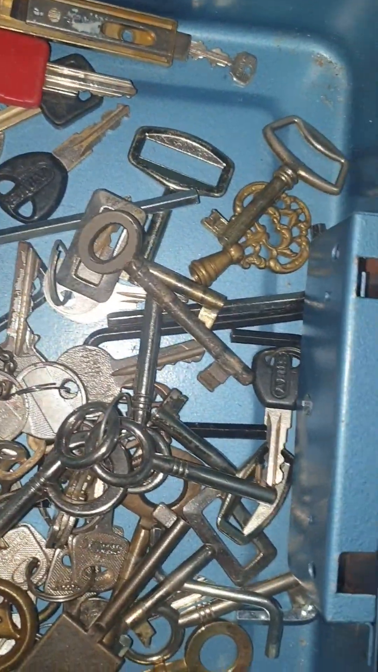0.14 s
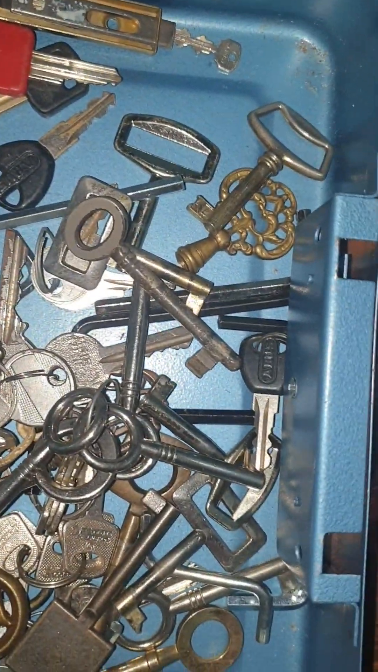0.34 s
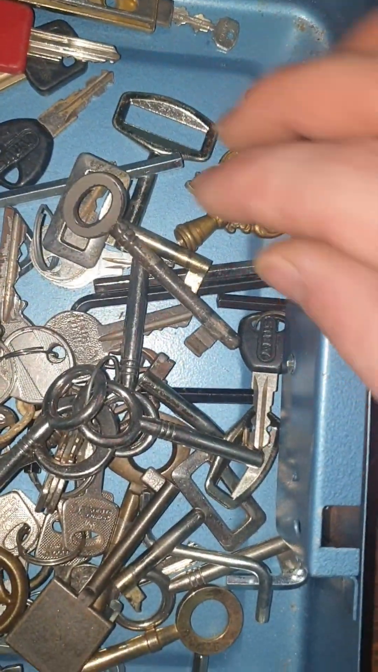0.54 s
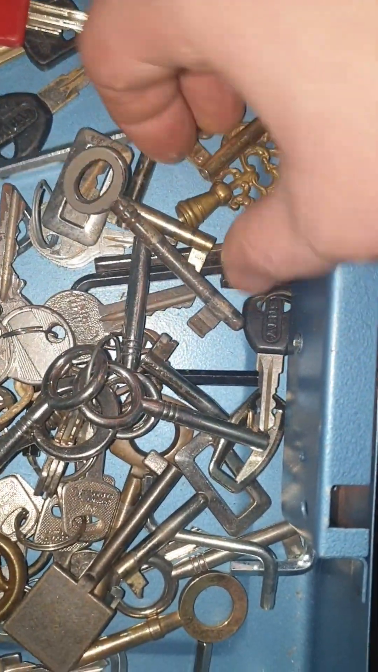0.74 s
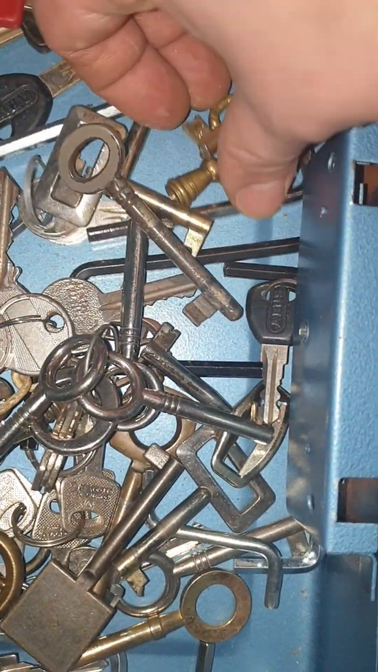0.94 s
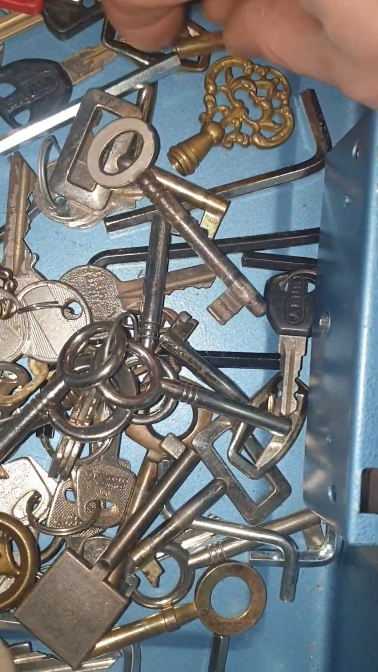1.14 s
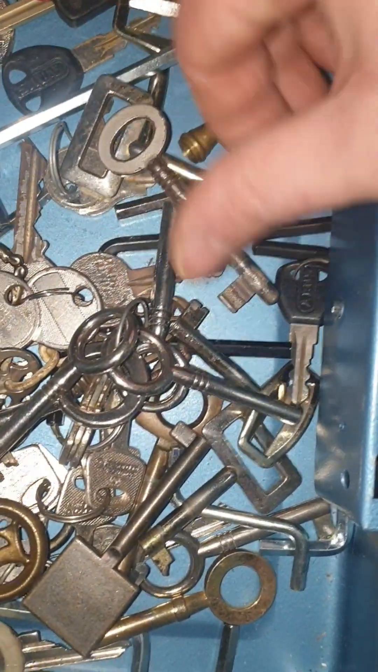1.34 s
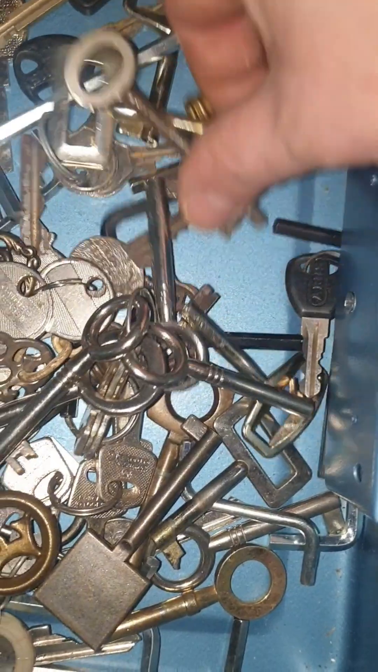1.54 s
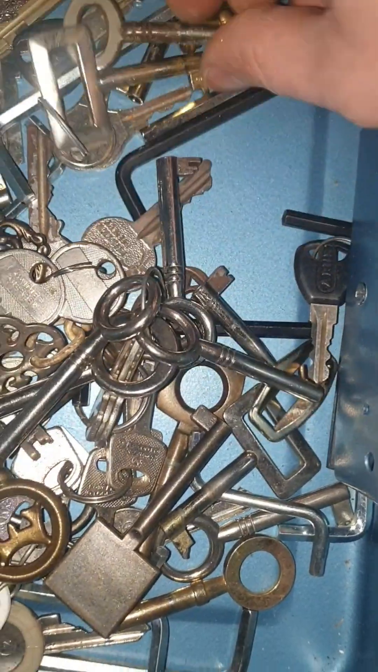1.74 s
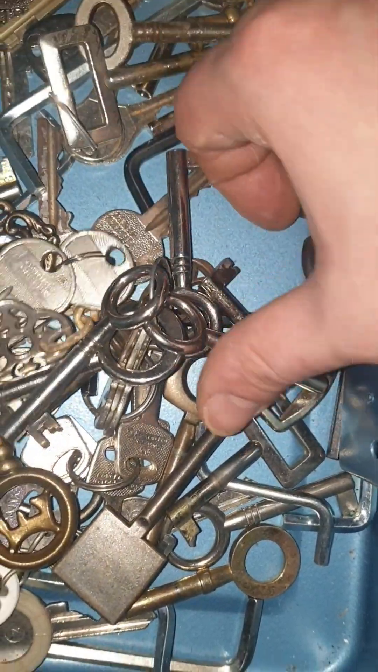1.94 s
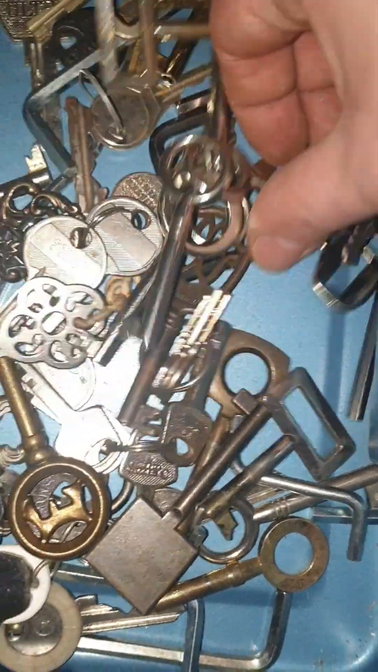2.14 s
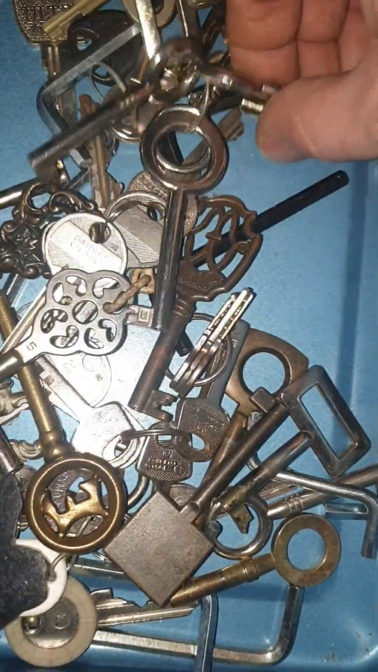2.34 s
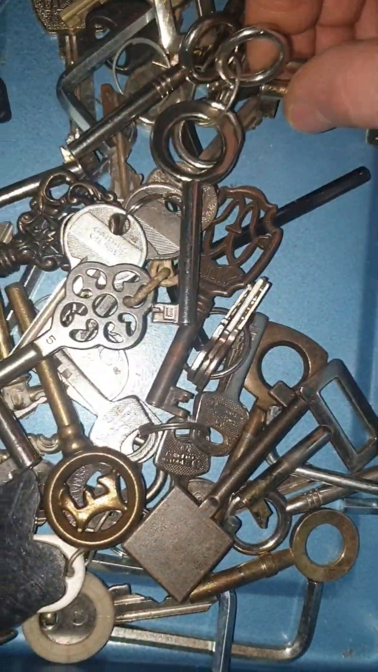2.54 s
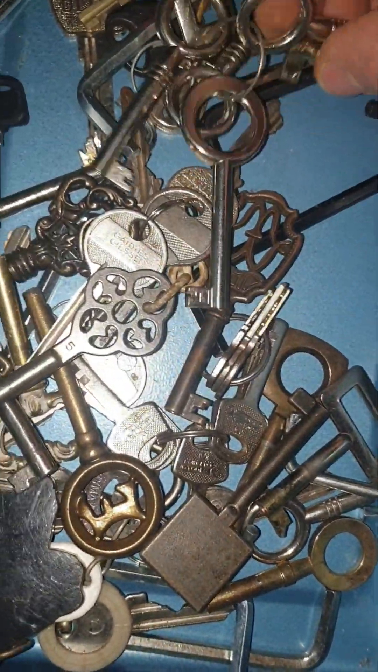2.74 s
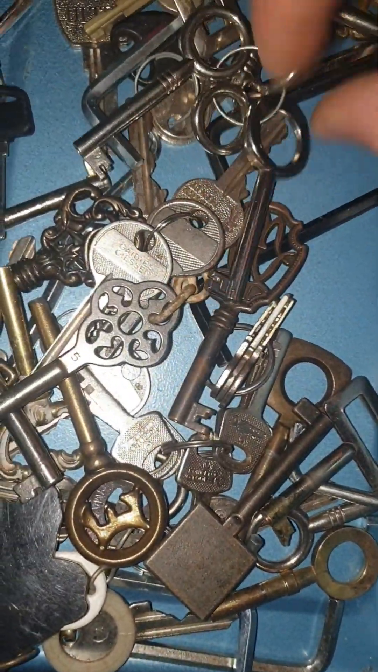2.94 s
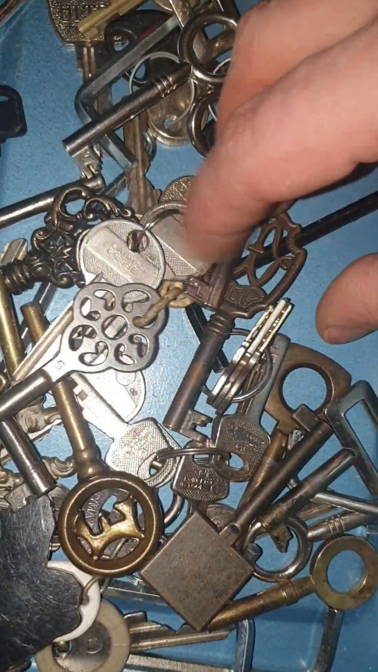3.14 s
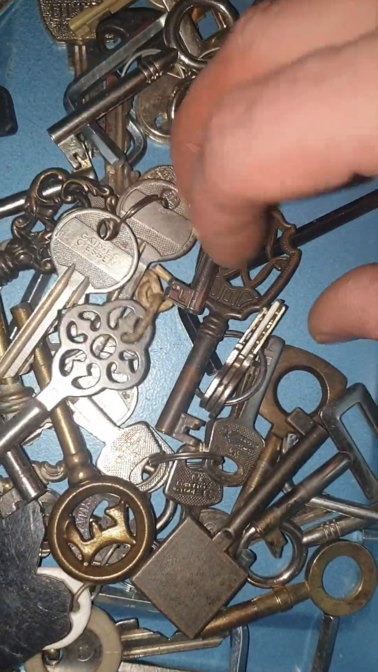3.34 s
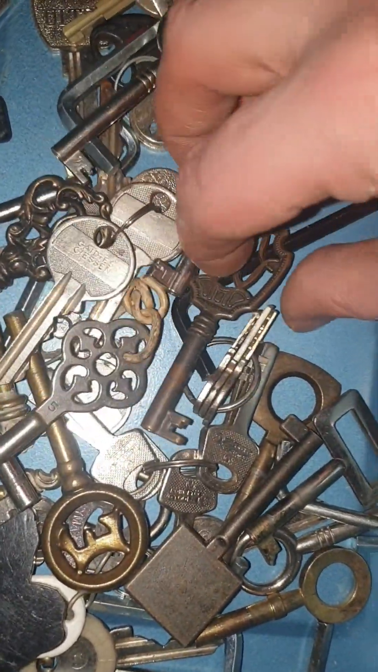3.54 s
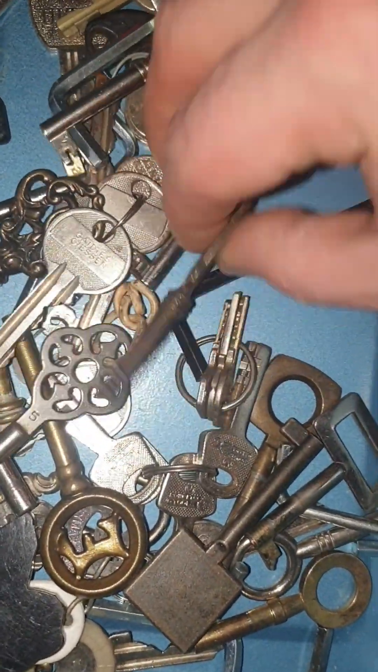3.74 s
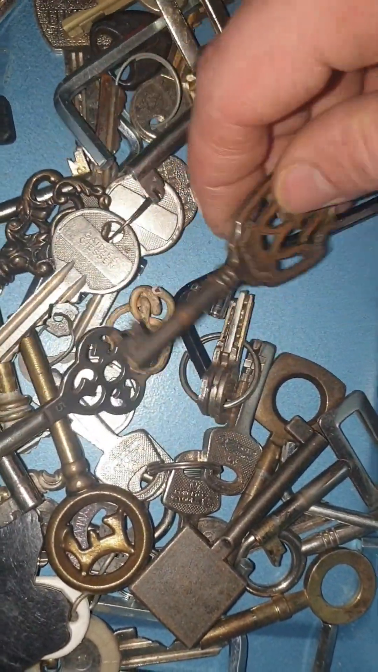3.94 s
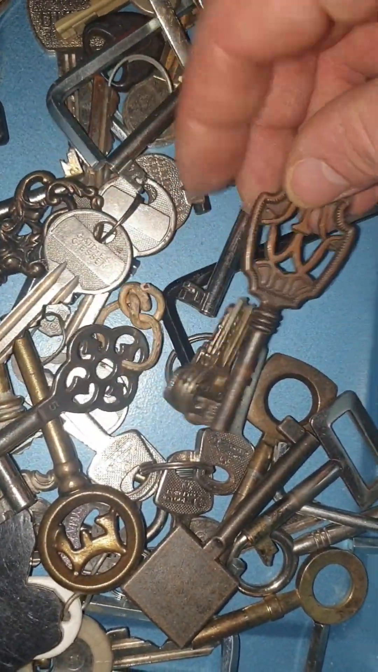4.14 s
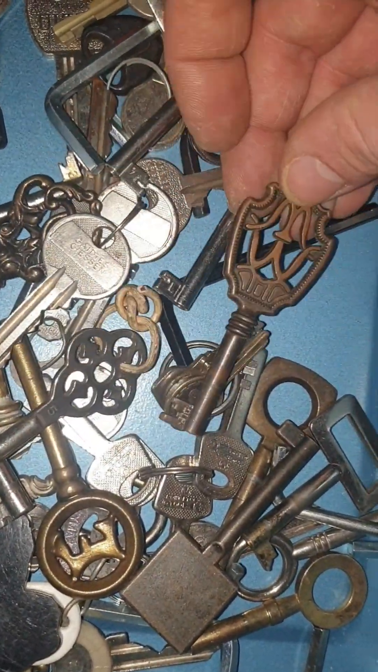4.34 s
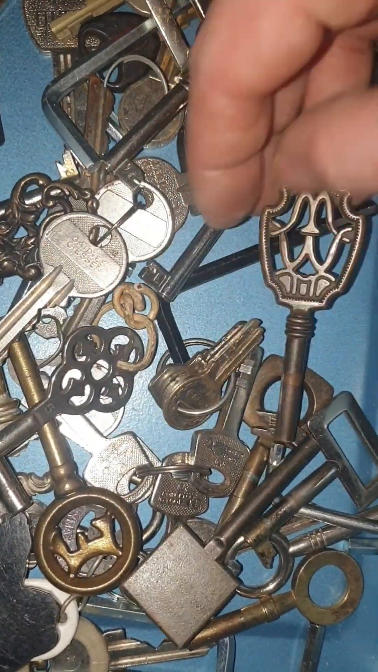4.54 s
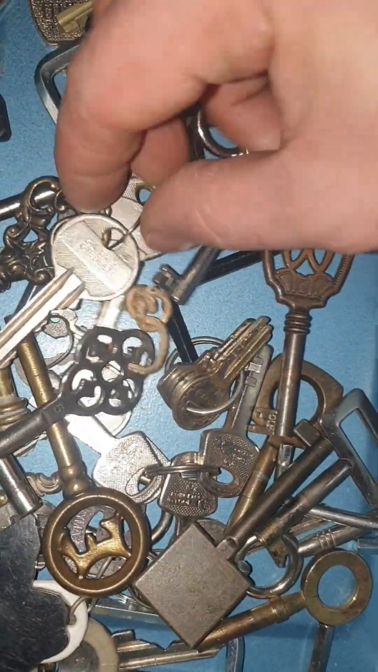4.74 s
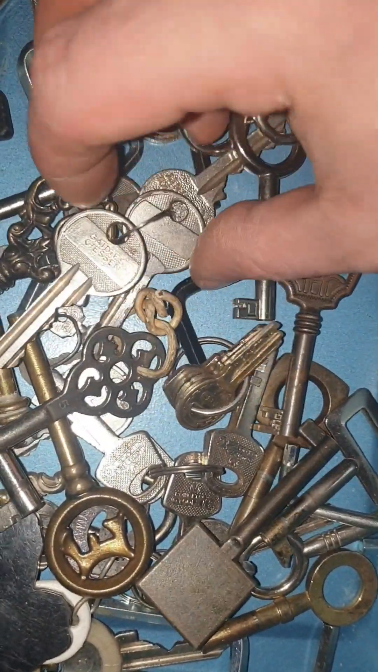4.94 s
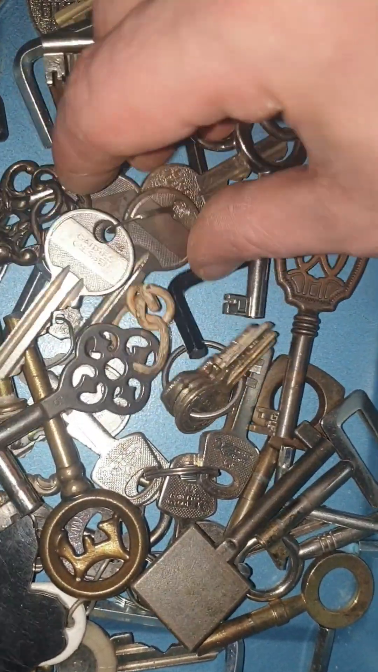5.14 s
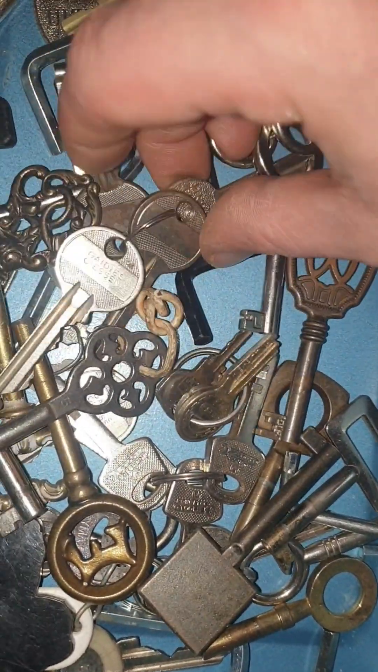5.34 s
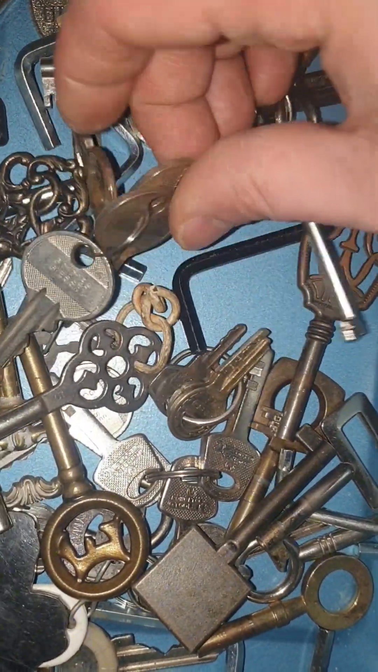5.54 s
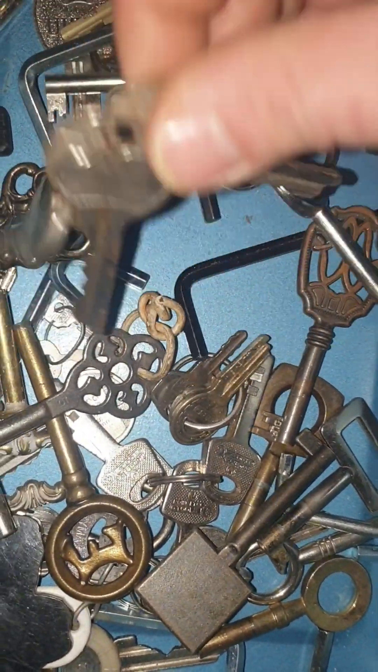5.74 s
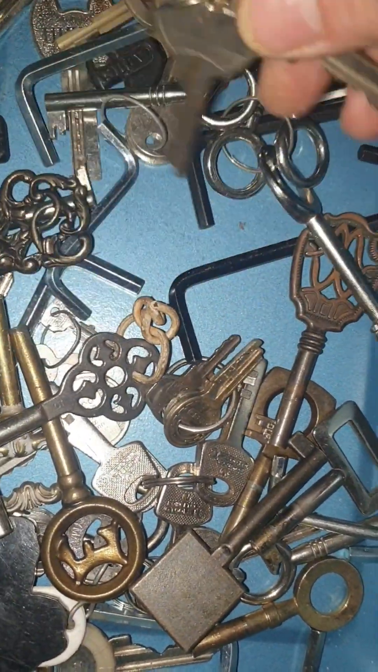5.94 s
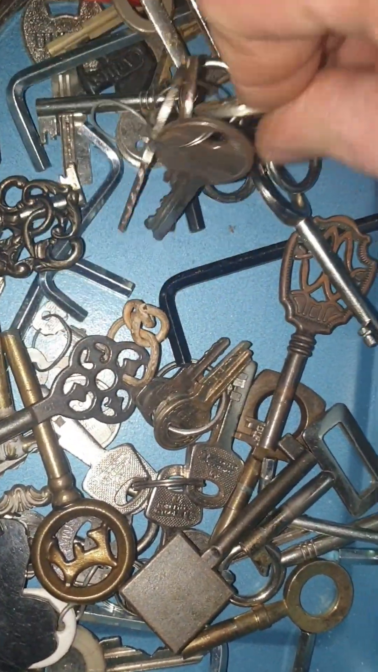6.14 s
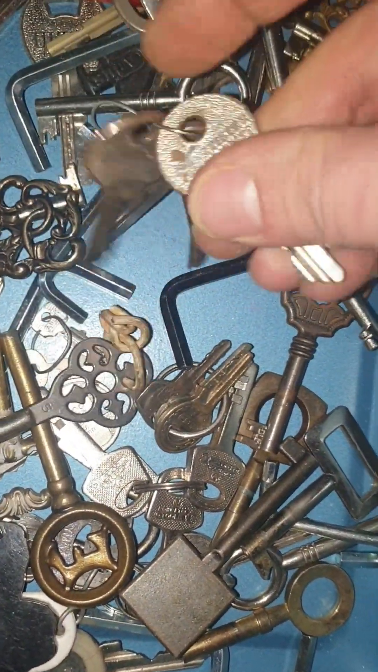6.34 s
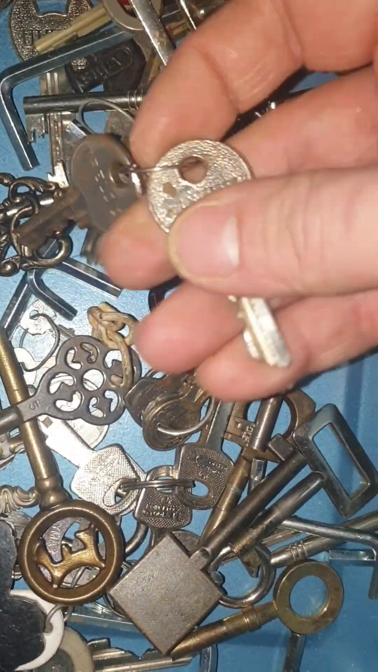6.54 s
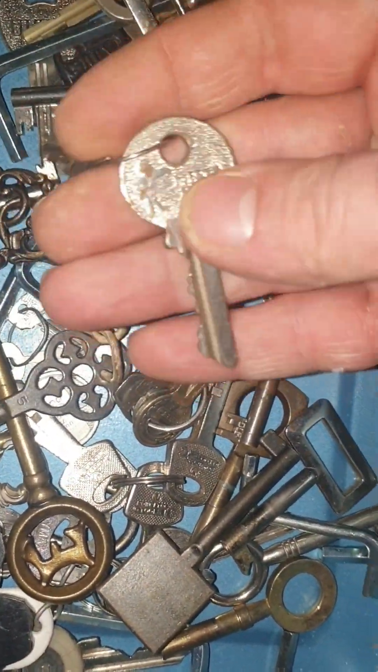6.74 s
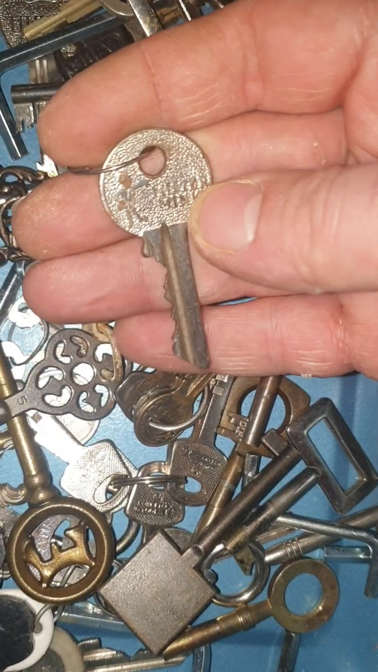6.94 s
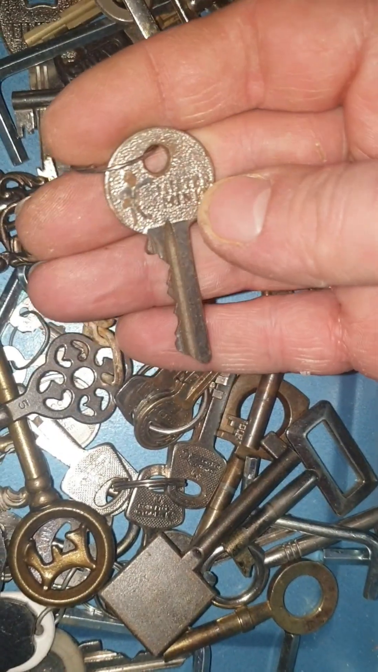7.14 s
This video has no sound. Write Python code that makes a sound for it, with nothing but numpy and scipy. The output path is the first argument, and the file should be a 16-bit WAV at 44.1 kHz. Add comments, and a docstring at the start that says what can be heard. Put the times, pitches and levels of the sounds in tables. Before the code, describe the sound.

A hand rummages through a pile of old keys in a metal box. The keys scrape, clatter and clink in uneven bursts, with thin, high pings over the sharper knocks. About two seconds in, the box takes a few soft bumps and the microphone rumbles from handling. The stirring continues, then a lifted bunch jingles and a few last clinks die away. It is heard close up on a phone in a small, quiet room.

```python
"""Rummaging through a box of keys

A hand stirs a pile of old keys in a metal box, close to a phone in a small room. Each shove sets the
keys scraping, jostling and pinging until the pile settles. The harder knocks stand out, and keys that
hang free ring on in the high treble. The box hums under the blows; the phone rumbles in the other hand."""
import sys
import numpy as np
from scipy import signal
from scipy.fft import rfft, irfft
from scipy.io import wavfile

SR = 44100
rng = np.random.default_rng(int(sys.argv[2]) if len(sys.argv) > 2 else 0)


def wav_out(sig):
    """Save sig, one row per channel (or a flat mono array), as 16-bit PCM at SR to the path in sys.argv[1]."""
    wavfile.write(sys.argv[1], SR, np.round(np.clip(np.atleast_2d(sig).T, -1, 1) * 32767).astype(np.int16))


N = 320607
T = np.arange(N) / SR
RUMMAGE_FROM_S, RUMMAGE_TO_S = .65, 5.75  # the hand works in the pile
KEY_DETUNE = .022  # similar keys differ in pitch by this share, so their rings beat
TOP_HZ = 15900  # the phone's treble limit


def amp(db):
    """Decibels to gain."""
    return 10 ** (np.asarray(db) / 20)


def fade(t, t60):
    """A decay of 60 dB in t60 seconds."""
    return np.exp(-np.log(1000) * t / t60)


def unit(x):
    """Scale to rms 1."""
    return x / np.sqrt(np.mean(x ** 2))


def add(out, start_s, sound):
    """Mix a sound into the track at its start time."""
    i = int(start_s * SR)
    out[:, i:i + sound.shape[1]] += sound[:, :N - i]


def band(x, lo_hz, hi_hz, order=2):
    """Band-pass along time."""
    return signal.sosfilt(signal.butter(order, [lo_hz, hi_hz], "band", fs=SR, output="sos"), x)


def colour(x, points):
    """A minimum-phase EQ through (Hz, dB) points."""
    hz, db = np.transpose(points)
    grid_hz = np.linspace(1, SR / 2, 513)
    gain = amp(np.interp(np.log(grid_hz), np.log(hz), db))
    cepstrum = irfft(np.log(gain))
    cepstrum[1:512] *= 2  # folded forward, so nothing rings ahead of a hit
    cepstrum[513:] = 0
    response = irfft(np.exp(rfft(cepstrum)))[:512]
    return signal.fftconvolve(x, np.array(response, ndmin=x.ndim), axes=-1)[..., :x.shape[-1]]


def moves(rows, attack_s, release_t60):
    """A gain envelope: each move of the hand builds up, holds and dies away."""
    out, t = np.zeros((1, N)), T[:SR]
    attack = np.clip(t / attack_s, 0, 1)
    for start, length, db in rows:
        release = fade(np.maximum(t - length, 0), release_t60)
        add(out, start, (amp(db) * attack * release)[None])
    return out[0]


# The tone of key touching key in the pile. Each row: frequency in Hz, gain in dB.
CONTACT_EQ = [(60, -22.5), (200, -14), (400, -6.5), (700, -1), (1400, 1), (2100, 3.5), (3300, -4),
              (4600, -7), (6400, -15), (7900, -24), (9300, -17), (10500, -10.5), (12200, -25.5),
              (15500, -31.5)]


def clacks(count, crack_t60=.016, walls_t60=.16, pile_t60=.06, chatter_s=.003, likeness=.19):
    """Stereo contacts: a chattering crack, echoes between the box walls and the pile's damped modes."""
    t = T[:5000]
    hz = np.geomspace(900, 15500, 300) * (1 + .005 * rng.standard_normal(300))
    tilt = (hz[:, None] / hz.mean()) ** .5
    modes = np.sin(2 * np.pi * hz[:, None] * t) * fade(t, pile_t60) * tilt
    # a different few modes stand out each time
    uneven_db = 10 * np.clip(rng.standard_normal((count, 1, len(hz))), -2.2, 2.2)
    weights = amp(uneven_db) * rng.standard_normal((count, 2, len(hz)))
    weights /= np.sqrt(np.sum(weights ** 2, axis=-1, keepdims=True))
    # the key touches a second time within a few milliseconds
    since_touch = t - chatter_s * rng.uniform(.65, 2, (count, 1, 1))
    chatter = amp(-2) * fade(np.abs(since_touch), crack_t60) * (since_touch > 0)
    envelope = fade(t, crack_t60) + chatter + amp(-16) * fade(t, walls_t60)
    crack = rng.standard_normal((count, 2, len(t))) * envelope
    pile = amp(-2) * weights @ modes
    attack = np.clip(t / .001, 0, 1)
    contacts = colour((crack + pile) * attack, CONTACT_EQ)
    # the right mic hears the same lows a little later, and partly different treble
    late_left = np.pad(contacts[:, 0], ((0, 0), (8, 0)))[:, :len(t)]
    blend = likeness * late_left + np.sqrt(1 - likeness ** 2) * contacts[:, 1]
    contacts[:, 1] = late_left + band(blend - late_left, 800, 10000, order=1)
    return contacts


# The hand jogs the box, or shoves or lifts a heap of keys.
# Each row: start in seconds, length in seconds, effort in dB.
HAND_SHOVES = [(0.027, 0.034, -53.5), (0.598, 0.12, -53), (0.643, 0.036, -32), (0.812, 0.2, -43),
               (1.079, 0.097, -34), (1.183, 0.029, -48.5), (1.407, 0.14, -29.5), (1.526, 0.12, -24),
               (1.328, 0.14, -62.5), (1.7, 0.18, -48.5), (1.931, 0.055, -37.5), (1.995, .12, -26),
               (2.117, 0.25, -33), (2.394, 0.13, -45), (2.583, 0.052, -40.5), (2.729, 0.079, -29),
               (2.861, 0.083, -27), (3.059, 0.31, -44.5), (3.412, 0.19, -43.5), (3.623, 0.17, -38.5),
               (3.813, .11, -32), (3.986, 0.18, -41), (4.321, 0.066, -56.5), (4.435, 0.067, -45.5),
               (4.605, 0.039, -24), (4.741, 0.074, -36), (4.811, 0.09, -34), (5.026, 0.17, -36.5),
               (5.27, 0.045, -33.5), (5.383, 0.2, -34.5), (5.597, 0.11, -40.5), (5.788, 0.017, -43),
               (6.341, .16, -50), (6.685, 0.025, -44), (6.836, 0.023, -48.5)]


def effort():
    """How hard the hand stirs, in dB: the keys get going quickly and take a moment to settle."""
    return 20 * np.log10(moves(HAND_SHOVES, attack_s=.023, release_t60=.2) + 1e-5)


def scraping(push_db, slips_per_s=480, spread_db=7, over_db=2, usual_push_db=-42):
    """Teeth and rings slide over each other in a stream of tiny slips, brighter when pushed harder."""
    kinds, scrape = clacks(count=20), 0
    for clack in kinds:
        slips = np.zeros(N)
        at = rng.integers(N, size=int(slips_per_s * N / SR / len(kinds)))
        slips[at] = amp(spread_db * np.clip(rng.standard_normal(len(at)), -2, 2))
        scrape = scrape + signal.oaconvolve(slips[None], unit(clack), axes=1)[:, :N]
    scrape = unit(scrape)
    body = signal.sosfiltfilt(signal.butter(2, 7500, fs=SR, output="sos"), scrape)
    treble = scrape - body
    treble_db = -2 + .9438 * (push_db - usual_push_db)
    return (body + amp(treble_db) * treble) * amp(push_db + over_db)


# The modes of the box's floor and walls. Each row: pitch in Hz, level in dB, t60 in seconds.
BOX_MODES = [(84, -12, .35), (99, -4, .4), (116, -9, .3), (253, -9, .3), (300, -11, .25), (530, -9, .2),
             (804, -10, .2), (934, -9, .2), (1336, -13, .2), (1780, -10, .25), (2035, -9, .18),
             (2400, -11, .2)]


def box_hum(blows, gain_db=-47):
    """The blows pass into the sheet metal, which hums on."""
    t = T[:SR]
    ring = sum(amp(db) * np.sin(2 * np.pi * hz * t) * fade(t, t60) for hz, db, t60 in BOX_MODES)
    return amp(gain_db) * signal.oaconvolve(blows, ring[None], axes=1)[:, :N]


def room(x):
    """A small furnished room; the lows stay longest and reach both mics alike."""
    t = T[:SR * 2 // 3]
    onset = np.clip(t / .0032 - .5, 0, 1)

    def tail(lo_hz, hi_hz, t60, db, channels):
        """One band of the reverb, as decaying noise."""
        noise = rng.standard_normal((channels, len(t))) * fade(t, t60) * onset
        return amp(db) * band(noise / np.sqrt(np.sum(noise ** 2) / channels), lo_hz, hi_hz)

    low = tail(60.4, 525, t60=.59, db=-12, channels=1)
    mid = tail(550, 12000, t60=.15, db=-13, channels=2)
    high = tail(2870, 14000, t60=.067, db=-18, channels=2)
    return signal.oaconvolve(x, low + mid + high, axes=1)[:, :N]


# The tone of the quiet room. Each row: frequency in Hz, gain in dB.
ROOM_TONE_EQ = [(30, -7), (100, -17), (400, -10.5), (2000, -6), (15000, -29.5)]


def room_tone(level_db=-81):
    """A faint, steady bed of air."""
    return amp(level_db) * unit(colour(rng.standard_normal((2, N)), ROOM_TONE_EQ))


# Faint handling before the hand reaches the pile.
# Each row: start in seconds, length in seconds, level in dB.
SKIN_BRUSHES = [(0.055, 0.05, -58), (0.445, 0.015, -65.5)]


def rustles():
    """Skin brushes near the phone, soft and dull."""
    brush = unit(band(rng.standard_normal(N), 130, 600))
    return brush * moves(SKIN_BRUSHES, attack_s=.0056, release_t60=.5)


def wall_rub(level_db=-57):
    """The heel of the hand rubs the box wall with a low murmur on each shove of the rummaging."""
    rubs = [(start, length, level_db) for start, length, _ in HAND_SHOVES
            if RUMMAGE_FROM_S < start + length < RUMMAGE_TO_S]
    murmur = unit(band(rng.standard_normal(N), 85, 150))
    return murmur * moves(rubs, attack_s=.048, release_t60=.3)


# The phone shifts in the grip. Each row: start in seconds, length in seconds, rumble level in dB.
GRIP_MOVES = [(0.64, .55, -52.5), (1.4, .2, -65), (1.85, .17, -48.5), (2.03, 0.31, -35),
              (2.36, 0.15, -44.5), (2.73, .1, -54), (4.53, .06, -39.5)]


def grip_rumble(left_db=-19, knuckle_db=-14, still_db=-84):
    """Fingers shifting on the phone rumble mostly into the right mic."""
    noise = rng.standard_normal((2, N))
    rumble = unit(band(noise, 45, 85, order=3)) * amp([[left_db], [0]])
    knuckles = amp(knuckle_db) * unit(band(noise[0], 90, 220))
    grip = moves(GRIP_MOVES, attack_s=.07, release_t60=.22) + amp(still_db)
    return (rumble + knuckles) * grip


# The featured hits of key on key. Each row: start in seconds, level of the mid clatter in dB,
# then the low knock and the bright tick, both in dB relative to the clatter.
KEY_HITS = [(0.6465, -18.5, -13.5, -1.5), (0.6858, -17, -16, -19), (0.6931, -16, -7.5, -10.5),
            (0.7527, -25, -10.5, -11.5), (0.834, -34.5, -1, -9), (0.936, -21.5, -7, -7.5),
            (1.0131, -29, -2.5, -20), (1.0556, -22.5, -7, -7.5), (1.1042, -24, -1.5, -8),
            (1.1154, -12, -9.5, -9.5), (1.1566, -14.5, -8, -11), (1.226, -28.5, -7.5, -10),
            (1.3099, -36, -8, -25), (1.4038, -25.5, -3.5, -19), (1.442, -11.5, -11.5, -7.5),
            (1.4513, -9.5, -19, -11), (1.5373, -15.5, -15, -25), (1.556, -11.5, -20.5, -22),
            (1.5709, -19, -15, -27), (1.596, -8.5, -12, -11), (1.6169, -18.5, -8, -7),
            (1.6717, -19.5, -26.5, -7), (1.7246, -26, -3, 0.5), (1.8061, -26, -6.5, -10.5),
            (1.9094, -30.5, -8, -0.5), (2.0327, -16.5, -11, -15), (2.0512, -12.5, -7, -7),
            (2.068, -11, -7.5, -8), (2.0848, -14, -10, -2.5), (2.1586, -14.5, -5, -5),
            (2.1886, -24, -14, -13), (2.3303, -15, -6, -8), (2.4445, -19.5, -3.5, -6.5),
            (2.5013, -32.5, -21.5, -17), (2.6138, -30.5, -3, -2), (2.7238, -30.5, -7, -8),
            (2.768, -22, -8, 0), (2.871, -22, 3.5, -4.5), (2.8937, -14.5, -5.5, -7),
            (2.9056, -13.5, -3, -2.5), (2.928, -18.5, -18, -0.5), (3.0695, -24, -5, -10),
            (3.1602, -29, -4.5, -6), (3.1813, -27, -4, -11), (3.236, -31.5, -3.5, -9.5),
            (3.2833, -30, -7.5, -4), (3.3184, -24.5, -1.5, -4.5), (3.429, -29.5, -3, -4),
            (3.469, -27, -4.5, -25), (3.528, -26, -9.5, -6.5), (3.754, -23, -3.5, -15),
            (3.8231, -23.5, -1, -15), (3.9165, -23, -8, -12), (4.041, -23.5, -12.5, -15),
            (4.0782, -28.5, -4, -26), (4.1463, -26, -4.5, -8), (4.304, -45.5, -6.5, -8.5),
            (4.4481, -34.5, -6, -14), (4.5176, -29, -1.5, -10.5), (4.55, -33.5, -9, -14),
            (4.6076, -10.5, -7, -8.5), (4.6266, -18.5, -6.5, -13), (4.6819, -24, -3, -7),
            (4.758, -27.5, -7.5, -4.5), (4.8157, -16, -5.5, -8.5), (4.9071, -13.5, -5, -7),
            (4.95, -15, -9, -5.5), (5.0487, -35, 1, -10), (5.0903, -19.5, -7, -25), (5.1429, -23.5, -4, -8),
            (5.288, -19, -9, -8.5), (5.3153, -18, -3, -8.5), (5.3878, -27.5, -5, -2.5),
            (5.4032, -31.5, -2, 5.5), (5.4921, -24.5, 0, -5), (5.51, -20.5, -6.5, -5),
            (5.6188, -17.5, -4.5, -13), (5.6717, -28, -8, -4), (5.7433, -28, -6.5, -4),
            (5.8144, -21, -8, -3), (5.8317, -25, -15.5, -7), (5.9903, -29.5, -5.5, -9),
            (6.134, -13, -3.5, -3), (6.1426, -12.5, -5.5, -13), (6.152, -15, -13.5, -6.5),
            (6.2913, -32.5, -10, 0.5), (6.3696, -30.5, -3.5, -22), (6.4111, -27, -9, -27),
            (6.426, -20.5, -2, -19), (6.4604, -26, -5, -9.5), (6.5466, -25.5, -6, -13),
            (6.6351, -39, -4, -7), (6.7086, -29.5, -6, -4), (6.8613, -30, -6.5, -7)]


def knocks(push_db):
    """Key strikes key, each blow with its own share of low knock, mid clatter and bright tick."""
    hits = np.vstack([KEY_HITS, rebounds(KEY_HITS), jostles(push_db)])
    starts, level_db, low_db, bright_db = hits.T
    contacts = clacks(count=len(starts))
    knock = band(contacts, 90, 1250)
    clatter = band(contacts, 1350, 6800, order=3)
    tick = band(contacts, 8400, 17000, order=3)
    blows, attack_samples = 0, int(.007 * SR)
    for layer, db in [(knock, level_db + low_db), (clatter, level_db), (tick, level_db + bright_db)]:
        attack_rms = np.sqrt(np.mean(layer[..., :attack_samples] ** 2, axis=(1, 2)))
        blows = blows + layer * (amp(db) / attack_rms)[:, None, None]
    out = np.zeros((2, N))
    for start, blow in zip(starts, blows):
        add(out, start, blow)
    return out


def rebounds(hits, soonest_s=.011, latest_s=.032, loss_db=-11, spread_db=2):
    """Extra hit rows: a knocked key falls back once, more softly and with the same colour."""
    starts, level_db, low_db, bright_db = np.transpose(hits)
    wait, luck = rng.random((len(starts), 2)).T
    delay_s = soonest_s + (latest_s - soonest_s) * wait
    softer_db = level_db + loss_db + spread_db * (2 * luck - 1)
    return np.column_stack([starts + delay_s, softer_db, low_db, bright_db])


def chance_contacts(push_db, count):
    """Times scattered through the rummaging, and the hand's effort at each."""
    progress = (np.arange(count) + rng.random(count)) / count
    starts = RUMMAGE_FROM_S + (RUMMAGE_TO_S - RUMMAGE_FROM_S) * progress
    return starts, np.interp(starts, T, push_db)


def jostles(push_db, over_db=3, spread_db=5.5, low_db=-5, bright_db=-8):
    """Extra hit rows: lesser knocks come by chance, following the strength of the shove."""
    starts, effort_db = chance_contacts(push_db, count=55)
    level, low, bright = spread_db * np.clip(rng.standard_normal((len(starts), 3)), -2, 2).T
    return np.column_stack([starts, effort_db + over_db + level, low_db + low, bright_db + bright])


# Flat keys in the pile ring near these notes. Each entry: pitch in Hz.
PING_PITCHES = [9900, 10800, 11000, 13800, 14800]


def pings(push_db, over_db=-5, spread_db=3, t60=.05):
    """Small keys spring clear of the pile for an instant and ring in rough clusters."""
    out, t = np.zeros((2, N)), T[:SR // 5]
    for start, effort_db in zip(*chance_contacts(push_db, count=90)):
        cluster_hz = rng.choice(PING_PITCHES) * (1 + KEY_DETUNE * rng.standard_normal(4))
        ring = sum(np.sin(2 * np.pi * (hz * t + rng.random((2, 1)))) for hz in cluster_hz) / 2
        stereo_gain = amp(effort_db + over_db + spread_db * rng.standard_normal((2, 1)))
        add(out, start, stereo_gain * ring * fade(t, t60))
    return out


# Fingers push keys along the box floor. Each row: start in seconds, length in seconds, level in dB.
FLOOR_DRAGS = [(0.83, 0.24, -46), (1.08, 0.033, -43.5), (1.79, 0.014, -41.5), (1.95, .22, -47),
               (3.5, 0.5, -54)]


def dragging(slips_per_s=300):
    """Keys pressed on the box floor judder along it with a dull scrape."""
    slips = (rng.random(N) < slips_per_s / SR) * rng.standard_normal(N)
    return unit(band(slips, 170, 600)) * moves(FLOOR_DRAGS, attack_s=.017, release_t60=.41)


# A flat key's bending modes. Each row: pitch as a ratio to the main ring, relative level in dB.
BENDING_MODES = [(1, 0), (.297, -24), (.612, -20), (.695, -25)]
# Keys that ring freely. Each row: start in seconds, pitch in Hz, level in dB, main t60 in seconds.
FREE_RINGS = [(1.232, 4090, -30.5, .07), (1.238, 4480, -37.5, 0.048), (1.407, 9900, -28, .09),
              (1.555, 11340, -13.5, .06), (1.597, 13824, -24, .11), (1.68, 9900, -31.5, .15),
              (2.151, 14800, -31, .17), (2.336, 9860, -26.5, .4), (2.431, 10840, -25, .06),
              (2.93, 10450, -30, .12), (4.082, 10630, -31, .08), (4.13, 10440, -22.5, .08),
              (4.518, 10300, -26, .06), (4.611, 8740, -29, .2), (4.628, 10300, -13.5, .16),
              (5.095, 10470, -18.5, .07), (5.777, 10500, -27, .09), (5.9, 10820, -24.5, .08),
              (5.99, 10400, -23.5, .1), (6.052, 10580, -19, .07), (6.081, 10300, -22, .09),
              (6.102, 10400, -18.5, .05), (6.135, 10800, -19, .09), (6.143, 1837, -30, .28),
              (6.263, 10860, -16, .04), (6.368, 10440, -19.5, .05), (6.427, 10400, -25, .08),
              (6.547, 10830, -24.5, .05), (6.696, 10740, -32, .06), (6.804, 10530, -33.5, .06)]


def free_keys(neighbour_db=-7, tick_db=1, linger_db=-13.5, linger_t60=.22):
    """A hanging key ticks, then rings in its bending modes, along with the similar keys it touches."""
    out, t = np.zeros((2, N)), T[:SR // 2]
    attack = np.clip(t / .001, 0, 1)
    for start, hz, db, t60 in FREE_RINGS:
        decay = fade(t, t60) + amp(linger_db) * fade(t, linger_t60)
        modes = [(hz * ratio, mode_db) for ratio, mode_db in BENDING_MODES if hz * ratio < TOP_HZ]
        neighbours = [(hz * (1 + KEY_DETUNE * offset), neighbour_db) for offset in rng.standard_normal(3)]
        ring = sum(amp(mode_db) * np.sin(2 * np.pi * (mode_hz * t + rng.random((2, 1))))
                   for mode_hz, mode_db in modes + neighbours)
        pitched_noise = unit(band(rng.standard_normal((2, len(t))), hz * .95, hz * 1.06, order=1))
        tick = amp(tick_db) * pitched_noise * fade(t, t60=.025)
        add(out, start, amp(db) * attack * (ring * decay + tick))
    return out


# The hand bumps the box. Each row: start in seconds, pitch in Hz, level in dB, t60 in seconds.
BOX_BUMPS = [(1.815, 155, -24.5, 0.052), (1.932, 92, -30, 0.22), (2.04, 112, -25, 0.12)]


def thuds():
    """Soft bumps rock the whole box for a few slow cycles."""
    out, t = np.zeros((2, N)), T[:SR // 2]
    for start, hz, db, t60 in BOX_BUMPS:
        attack = np.clip(t * hz, 0, 1)  # one cycle long
        thud = amp(db) * attack * np.sin(2 * np.pi * hz * t) * fade(t, t60)
        add(out, start, thud[None])
    return out


# The phone's body shades the right mic. Each row: frequency in Hz, gain in dB.
RIGHT_MIC_EQ = [(100, -6), (500, -5), (1400, -2.5), (3000, -2), (7000, -2), (10400, -10.5), (13000, 2.5)]


def scene(keys_gain_db=.56):
    """Keys, box and room, a little to the left, over hand noise and room tone."""
    push_db = effort()
    blows = knocks(push_db) + scraping(push_db) + dragging()
    keys = blows + box_hum(blows) + free_keys() + pings(push_db) + thuds()
    left, right = amp(keys_gain_db) * (keys + room(keys))
    at_mics = np.array([left, colour(right, RIGHT_MIC_EQ)])
    return at_mics + room_tone() + wall_rub() + rustles() + grip_rumble()


def record(dry, ceiling=.9):
    """The phone rounds off the peaks and cuts the top."""
    rounded = ceiling * np.tanh(dry / ceiling)
    return signal.sosfilt(signal.ellip(8, .2, 70, TOP_HZ, fs=SR, output="sos"), rounded)


dry = scene()
out = record(dry)
wav_out(out)
```